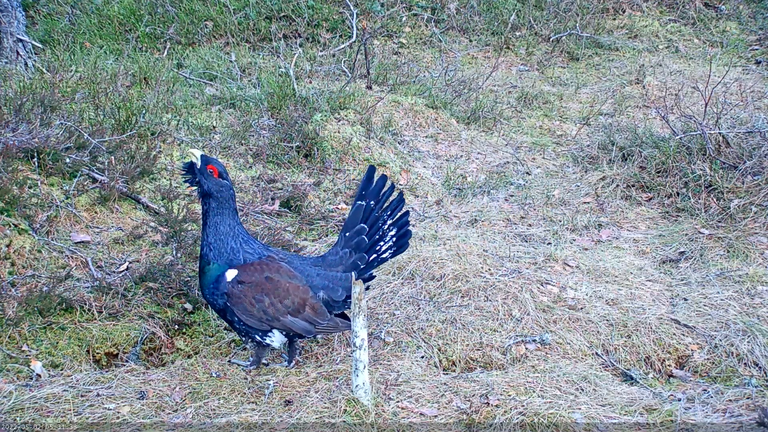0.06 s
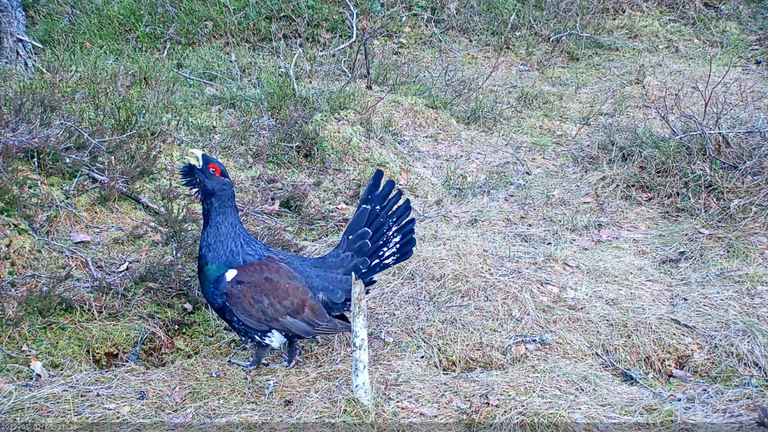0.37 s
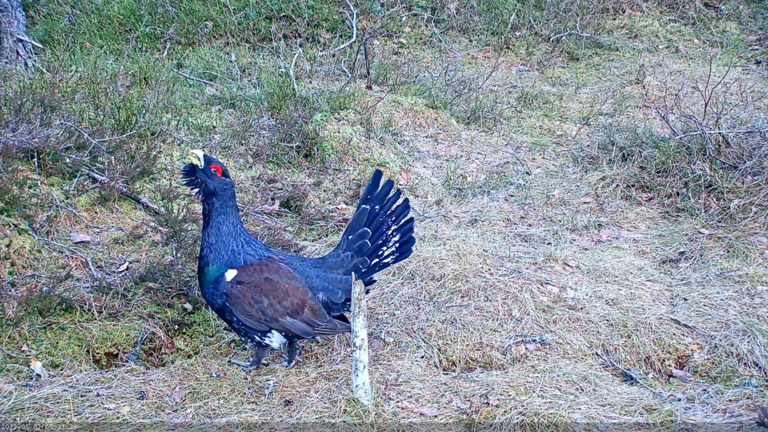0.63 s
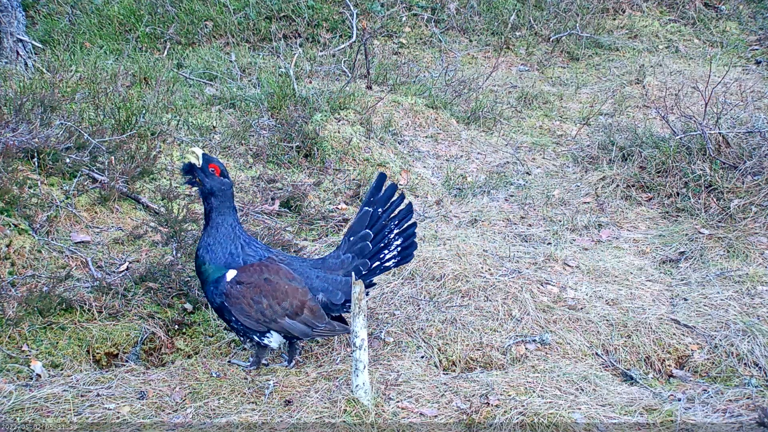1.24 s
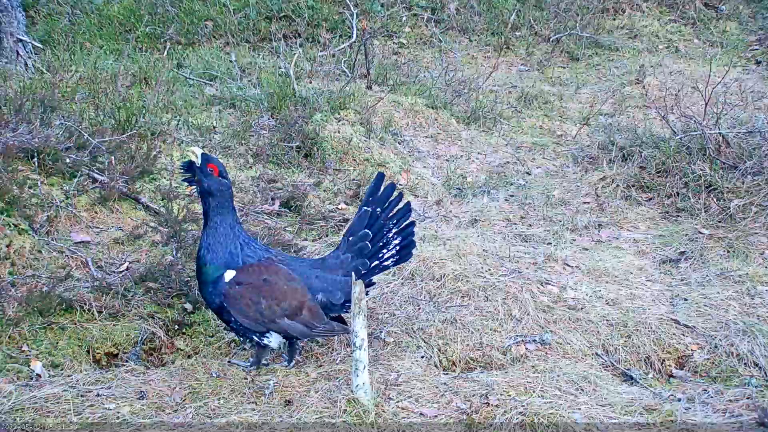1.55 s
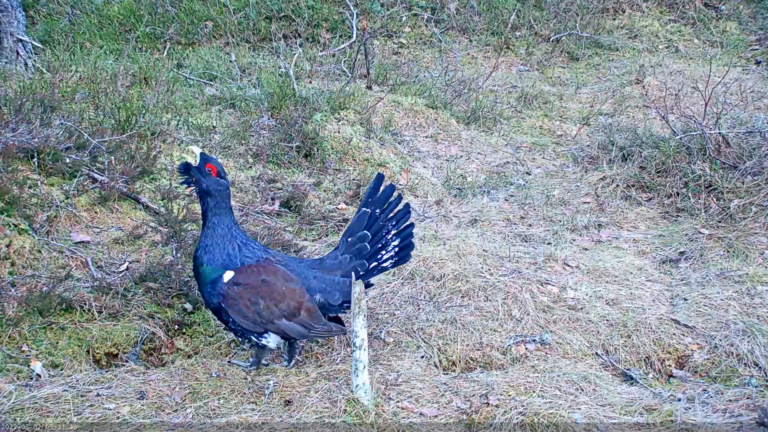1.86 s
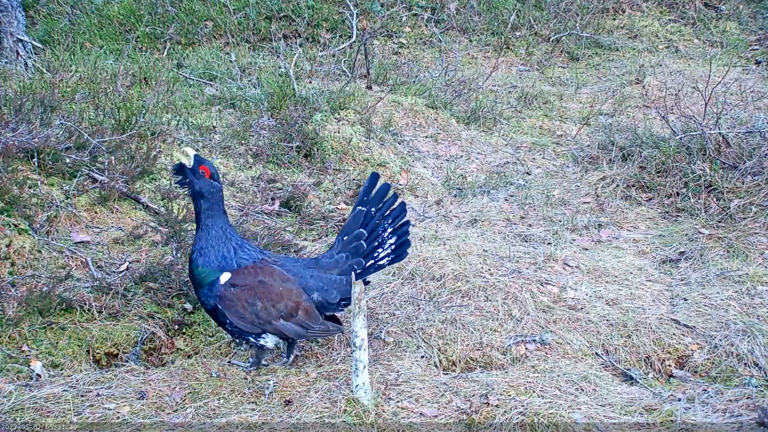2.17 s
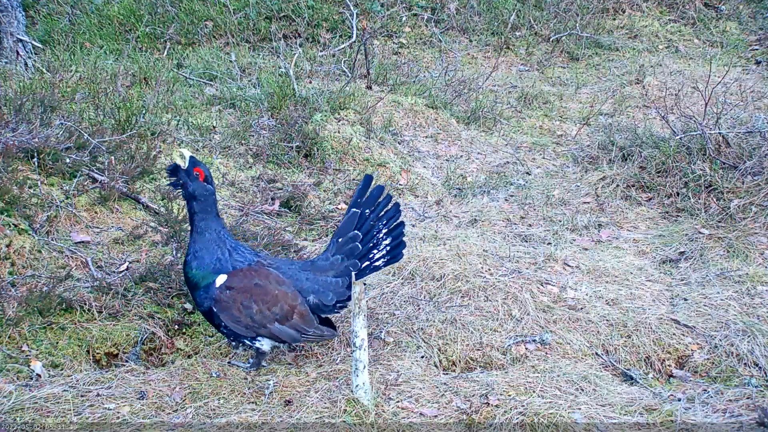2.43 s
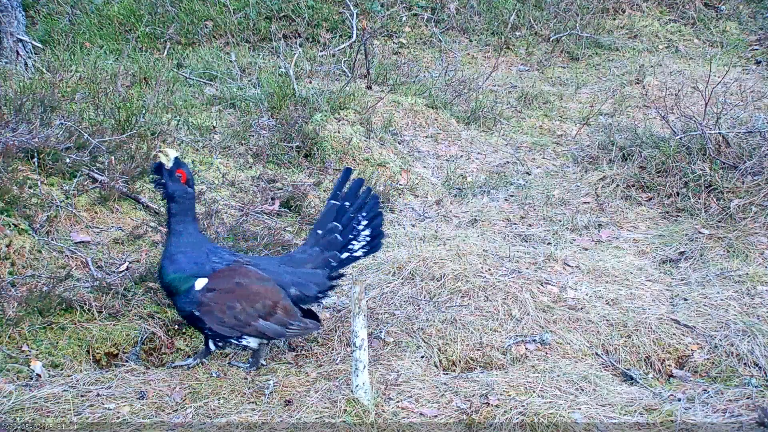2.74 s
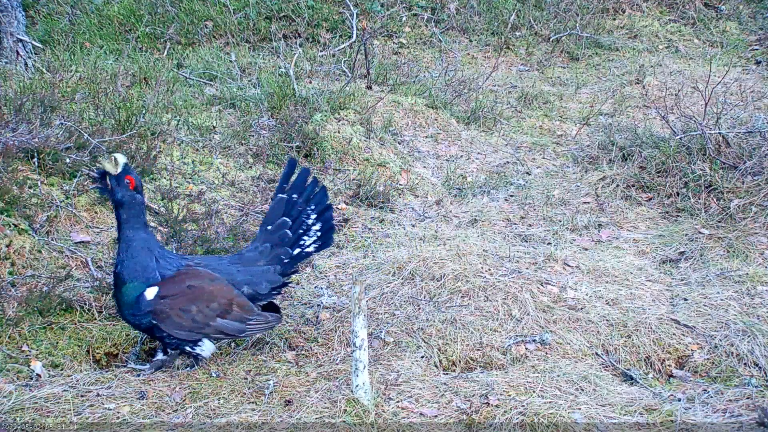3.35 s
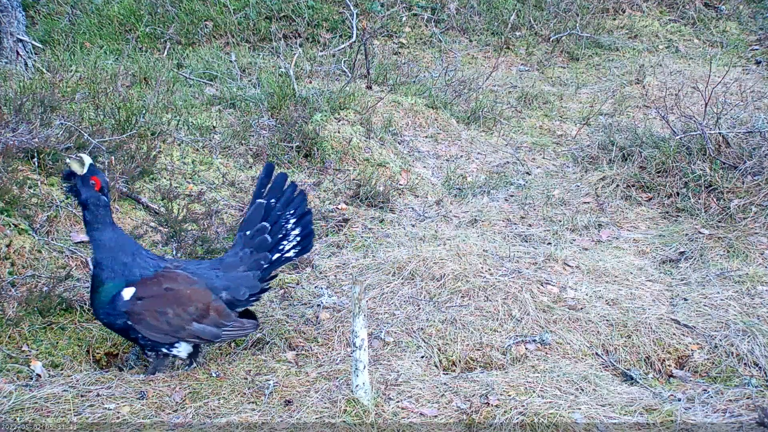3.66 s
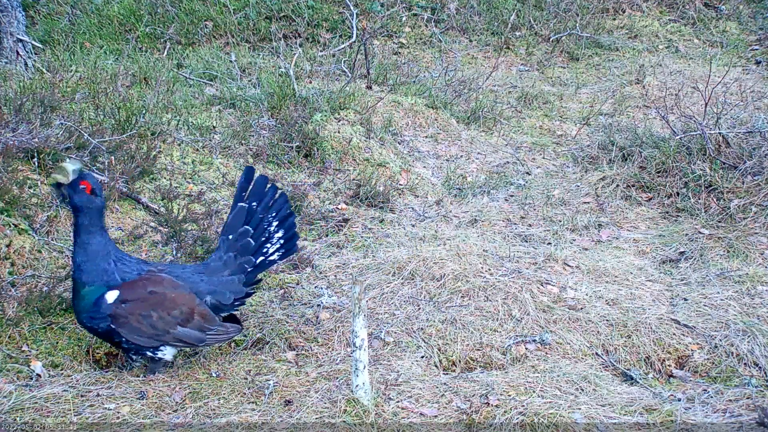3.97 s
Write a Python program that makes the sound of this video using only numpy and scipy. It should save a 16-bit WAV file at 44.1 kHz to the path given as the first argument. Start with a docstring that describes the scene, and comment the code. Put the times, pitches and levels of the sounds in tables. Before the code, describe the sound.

A large grouse clicks close by in hollow pairs at about 0.3, 1.3 and 2 seconds. The clicks quicken into a roll, ending near 3 seconds in a cork-like pop with low thumps, then faint steps in grass. Short dry rasps follow until about 3.9 seconds. From 3.3 seconds a small songbird repeats rising whistles and double notes. Faint distant birdsong, low rumble and soft hiss fill the forest behind.

```python
"""Open forest ground, a capercaillie displaying near the microphone. Paired throat clicks ring its
windpipe and beak, speed up into a roll and end in a cork pop, with low thumps, footsteps and brushed
grass as it moves. Then it whets in dry rasps, while a small songbird starts up with rising whistles and
double notes. The ground gives a close echo and the trees a faint tail; behind lie a far songbird,
low rumble and soft hiss."""
import sys
import numpy as np
from scipy import signal
from scipy.fft import rfft, irfft
from scipy.io import wavfile
from scipy.ndimage import uniform_filter1d

SR = 44100
rng = np.random.default_rng(int(sys.argv[2]) if len(sys.argv) > 2 else 0)


def pcm_store(signal):
    """Save signal as 16-bit PCM."""
    levels = np.round(np.clip(np.atleast_2d(signal), -1, 1) * 32767)
    wavfile.write(sys.argv[1], SR, levels.astype(np.int16).T)


N = 176400
T = np.arange(N) / SR

# Throat clicks, near the microphone: (time [s], snap level [dB], hollow pitch [Hz],
# hollow level before its swell [dB], hollow t60 [s], throat pitch [Hz], throat level [dB],
# beak pitch [Hz], upper pitch [Hz], upper level [dB], top pitch [Hz], top level [dB])
THROAT_CLICKS = [(0.339, -34.5, 400, -30, 0.039, 1385, -50.5, 2890, 4450, -39, 6070, -44.5),
                 (0.4806, -42, 385.5, -36, 0.039, 1420, -53, 2460, 3090, -40.5, 5410, -54.5),
                 (1.2958, -40, 388, -31, 0.028, 1370, -47.5, 2910, 4380, -40.5, 5170, -40.5),
                 (1.4063, -39, 338, -35.5, 0.036, 1346, -63, 2870, 4160, -53.5, 6030, -49.5),
                 (1.9477, -39, 370, -32.5, 0.021, 1324, -58.5, 3090, 5140, -46.5, 6160, -52.5),
                 (2.041, -41, 330, -36, 0.032, 1360, -57, 2840, 4620, -50, 6170, -46),
                 (2.3008, -37, 330, -35, 0.026, 1260, -58.5, 3090, 4650, -43, 6150, -54),
                 (2.3731, -45.5, 371, -36.5, 0.029, 1323, -56, 3030, 5100, -49, 6150, -48.5),
                 (2.5248, -39.5, 303, -34.5, 0.016, 1220, -64.5, 3400, 4600, -44, 5820, -51),
                 (2.6826, -43.5, 288, -35, 0.014, 1125, -66.5, 3420, 4840, -52.5, 6410, -47),
                 (2.7888, -46.5, 280, -43, 0.018, 1124, -67, 3360, 4550, -48.5, 5800, -59.5),
                 (2.8361, -42.5, 263, -40.5, 0.017, 1125, -66, 3220, 4520, -44.5, 6230, -64.5),
                 (2.8806, -39.5, 277, -32.5, 0.0083, 1260, -62.5, 3170, 4500, -43, 6140, -48.5)]
# Windpipe modes rung by every click: (pitch [Hz], level against the snap [dB], t60 [s])
WINDPIPE_MODES = [(491.7, -5.5, 0.019), (726, -10.5, 0.062), (1975, -17, 0.041), (2710, -3, 0.028),
                  (3260, -6, 0.017), (4024, -11.5, 0.02), (7200, -23, 0.016)]

def clicks(beak_db=5.5, beak_t60=0.015, upper_t60=0.019, throat_t60=0.034, swell_db=5, swell_s=0.0028):
    """Each snap rings the windpipe and the open beak; the hollow throat swells a moment later."""
    out, t = np.zeros(N), T[:SR // 8]
    swell = from_db(swell_db) * (1 - np.exp(-t / swell_s))
    for (s, snap_db, hollow_hz, hollow_db, hollow_t60, throat_hz, throat_db,
         beak_hz, upper_hz, upper_db, top_hz, top_db) in THROAT_CLICKS:
        windpipe = sum(from_db(snap_db + db) * ring(t, hz, t60) for hz, db, t60 in WINDPIPE_MODES)
        beak = from_db(snap_db + beak_db) * ring(t, beak_hz, beak_t60)
        beak += from_db(upper_db) * ring(t, upper_hz, upper_t60)
        beak += from_db(top_db) * ring(t, top_hz, upper_t60)
        hollow = from_db(hollow_db) * swell * ring(t, hollow_hz, hollow_t60)
        throat = from_db(throat_db) * ring(t, throat_hz, throat_t60)
        add(out, s, hollow + throat - windpipe - beak)
    return out

# The cork pop, soft pops just before it, and small hollow footsteps after it:
# (time [s], level [dB], start pitch [Hz], end pitch [Hz], t60 [s])
POPS_AND_STEPS = [(2.906, -59, 880, 880, .04), (2.976, -51, 524, 405, 0.19),
                  (3.052, -34.5, 698, 844, 0.031), (3.226, -49.5, 504, 430, 0.05),
                  (3.365, -53.5, 873, 860, 0.025), (3.659, -58.5, 933, 894, 0.046),
                  (3.753, -52, 805, 754, 0.029)]

def pops_and_steps(glide_s=0.0066, rise_s=0.00062):
    """Short hollow knocks whose pitch slides as they die."""
    out, t = np.zeros(N), T[:SR // 8]
    for s, db, start_hz, end_hz, t60 in POPS_AND_STEPS:
        hz = end_hz + (start_hz - end_hz) * np.exp(-t / glide_s)
        envelope = from_db(db - 60 * t / t60) * (1 - np.exp(-t / rise_s))
        add(out, s, envelope * sine(hz))
    return out

# Whetting strokes: (time [s], length [s], level [dB], low mode [Hz], middle mode [Hz], middle trim [dB])
WHET_STROKES = [(3.12, 0.058, -60.5, 2560, 4570, 0), (3.18, .06, -65.5, 2500, 4700, -2),
                (3.325, .045, -63, 3100, 4300, -1), (3.42, 0.022, -49.5, 2880, 4150, -1),
                (3.526, 0.038, -50, 2940, 4100, 1.5), (3.622, 0.03, -52.5, 3060, 4050, 2.5),
                (3.70, 0.038, -49, 2930, 4900, -4.5), (3.797, 0.082, -47.5, 3050, 4114, -1.5)]
# Resonances common to all strokes: (centre [Hz], width [Hz], relative level [dB])
WHET_MODES = [(1830, 200, -21), (2420, 300, -15), (5150, 350, -15), (6330, 550, -3), (7400, 400, -20)]
# Broad airy noise in each stroke: (frequency [Hz], relative level [dB])
WHET_AIR = [(400, 9), (1100, -9.5), (1800, -2), (2500, -5), (5200, 4.5), (6500, -16), (6900, -23.5),
            (7600, -7.5), (8500, -14.5)]
# Tone curve that dulls the top of the rasps: (frequency [Hz], gain [dB])
WHET_COLOUR = [(300, -5.5), (6550, -1), (6900, -8), (7500, -4.5), (8200, -12.5)]

def rasps(attack_s=0.011, release_s=0.014, pulse_hz=110, jitter=0.32, pulse_db=2, grain_db=0.5):
    """Friction noise, chopped by uneven pulses, through the throat and beak resonances."""
    out, t = np.zeros(N), T[:SR // 5]
    n = len(t)
    air = from_db(-9.5) * noise(WHET_AIR)
    for k, (s, length, db, low_hz, middle_hz, trim_db) in enumerate(WHET_STROKES):
        modes = WHET_MODES + [(low_hz, 500, -5.5), (middle_hz, 830, trim_db - 5.5)]
        friction = sum(from_db(mode_db) * band(hz, width, n) for hz, width, mode_db in modes)
        friction += air[k * n:(k + 1) * n]
        attack = np.minimum(t / attack_s, 1)
        release = np.exp(-np.maximum(t - length + release_s / 2, 0) / release_s)
        pulses = sine(pulse_hz * (1 + jitter * drift(pulse_hz, n)))
        roughness_db = pulse_db * pulses - grain_db * drift(pulse_hz, n)
        add(out, s, friction * attack * release * from_db(db + roughness_db))
    return colour(out, WHET_COLOUR)

# Low thumps as the bird moves: (time [s], level [dB], pitch [Hz])
BODY_THUMPS = [(2.919, -34, 118.4), (2.987, -37.5, 113.4), (3.020, -33.5, 118.5), (3.055, -37.5, 110)]

def thumps(rise_s=0.0075, scuff_db=-24.5, scuff_hz=420):
    """Soft pushes of a few low cycles, each with a dull scuff."""
    out, t = np.zeros(N), T[:SR // 8]
    swell = (t / rise_s * np.exp(1 - t / rise_s)) ** 2
    for s, db, hz in BODY_THUMPS:
        scuff = from_db(scuff_db) * band(scuff_hz, scuff_hz, len(t))
        push = np.sin(2 * np.pi * hz * t)
        add(out, s, from_db(db) * swell * (scuff - push))
    return out

# Dry grass at the bird's feet: (time [s], length [s], level [dB], centre [Hz], width [Hz])
GRASS_RUSTLES = [(2.947, 0.056, -73.5, 6400, 1370), (3.029, 0.037, -67, 5650, 1340),
                 (3.054, 0.055, -66.5, 4300, 347), (3.089, 0.051, -69.5, 7270, 392),
                 (3.134, 0.084, -66.5, 480, 330), (3.36, 0.83, -75, 507, 493)]

def rustles():
    """Grass brushed as the bird steps gives soft swells of noise."""
    out, t = np.zeros(N), T[:SR]
    for s, length, db, hz, width_hz in GRASS_RUSTLES:
        swell = np.sin(np.pi * np.minimum(t / length, 1))
        add(out, s, from_db(db) * swell * band(hz, width_hz, len(t)))
    return out

# Small songbird's rising whistle: (time from its break [s], pitch [Hz], relative level [dB])
RISING_GLIDE = [(-.022, 4430, -17.5), (-.003, 5200, -1), (.003, 4390, -14), (.009, 4860, -3.5),
                (.024, 5260, -0.5), (.045, 5750, -1), (.062, 6130, -1), (.069, 6150, -6)]
# Its repeats in the clearing: (time [s], level [dB], pitch [factor], length [factor])
RISING_CALLS = [(3.296, -46.5, 1.03, 0.97), (3.496, -39.5, 0.99, .92), (3.709, -36, 1.005, 1.01),
                (3.919, -37, 0.97, 1.03)]
# Double note after each whistle: (time from its first crest [s], pitch [Hz], relative level [dB])
DOUBLE_GLIDE = [(-.021, 3155, -11), (-.008, 3825, 2), (0, 4520, 1.5), (.003, 3434, -19),
                (.007, 2820, -16.5), (.0105, 3276, 2), (.014, 4450, -2.5), (.018, 3970, 6), (.024, 3627, 3),
                (.033, 3110, -15)]
# Its repeats: (time [s], level [dB], pitch [factor], length [factor])
DOUBLE_CALLS = [(3.381, -46, 1.0, 0.98), (3.592, -41.5, 1.0, 0.96), (3.803, -41, 0.99, 0.95),
                (4.012, -40.5, 1.0, 0.77)]

def small_songbird(glide, calls, waver_share=0.0031, waver_hz=239, flutter_db=0.86, flutter_hz=258):
    """Near-pure, slightly unsteady tones that repeat one glide."""
    out, t = np.zeros(N), T[:SR // 6]
    times, pitches, levels = np.transpose(glide)
    for s, db, pitch, stretch in calls:
        position = times[0] + t / stretch
        waver = 1 + waver_share * drift(waver_hz, len(t))
        hz = pitch * np.interp(position, times, pitches) * waver
        envelope = from_db(np.interp(position, times, levels)) * (position < times[-1])
        envelope = uniform_filter1d(envelope, size=60, mode="constant")  # soften the edges
        flutter = from_db(flutter_db * drift(flutter_hz, len(t)))
        add(out, s + times[0] * stretch, from_db(db) * envelope * flutter * sine(hz))
    return out

# Colour of the scatter from heather and trees: (frequency [Hz], gain [dB])
FOREST_COLOUR = [(100, -12.5), (400, 0), (1200, 11), (3000, 3.5), (4500, 7), (8000, 6.5)]

def clearing(direct, ground_lag_s=0.0035, ground_db=-10):
    """The microphone hears the direct sound, a close ground echo, heather scatter and a tail of trees."""
    ground = from_db(ground_db) * np.interp(T - ground_lag_s, T, direct)
    heather = scatter(db=-15, t60=0.1)
    trees = scatter(db=-19, t60=1)
    tail = colour(signal.fftconvolve(direct, heather + trees), FOREST_COLOUR)
    return direct + ground + tail[:N]

# Song far off in the forest: (time [s], length [s], level [dB], start pitch [Hz], end pitch [Hz])
FAR_SONG = [(0, 0.2, -73, 3560, 2940), (0.084, 0.13, -74, 6000, 3750), (.12, 0.28, -71, 4300, 2860),
            (.5, 0.35, -78, 3460, 2800), (1.053, 0.14, -78.5, 3940, 2910), (2.674, 0.17, -64, 2900, 2430),
            (2.798, 0.29, -64.5, 3100, 2675)]

def far_songbird(blur_hz=460):
    """Falling notes, blurred by the trees on their way to the microphone."""
    out, t = np.zeros(N), T[:SR // 4]
    for s, length, db, start_hz, end_hz in FAR_SONG:
        progress = np.minimum(t / length, 1)
        tone = sine(start_hz + (end_hz - start_hz) * progress)
        add(out, s, from_db(db) * np.sin(np.pi * progress) * drift(blur_hz, len(t)) * tone)
    return out

# Low rumble behind the birds: (frequency [Hz], relative level [dB])
RUMBLE_SPECTRUM = [(12, -37), (20, -4), (49, -9.5), (69, -7.5), (91, 0), (131, -9), (151, -18),
                   (178, -20.5), (209, -23), (250, -25.5), (320, -67), (550, -120)]
# Soft hiss above it: (frequency [Hz], relative level [dB])
HISS_SPECTRUM = [(120, -31), (200, -2.5), (352, -4.5), (558, -4.5), (611, -9), (1350, -18), (2910, -12.5),
                 (6960, -26.5), (7750, -32.5), (10100, -49.5), (17000, -120)]

def ambience(rumble_db=-56.5, hiss_db=-70):
    """The steady bed of the place: low rumble and soft hiss."""
    return from_db(rumble_db) * noise(RUMBLE_SPECTRUM) + from_db(hiss_db) * noise(HISS_SPECTRUM)

def from_db(db):
    """Decibels to gain."""
    return 10 ** (np.asarray(db) / 20)

def rms_one(x):
    """Scale to unit power."""
    return x / np.sqrt(np.mean(x ** 2) + 1e-20)

def add(out, s, x):
    """Mix x in at time s."""
    i = int(s * SR)
    out[i:i + len(x)] += x[:max(N - i, 0)]

def sine(hz):
    """A sine that follows a moving frequency."""
    return np.sin(2 * np.pi * np.cumsum(hz) / SR)

def ring(t, hz, t60, rise_s=0.00088):
    """One mode that builds quickly and dies away."""
    return np.sin(2 * np.pi * hz * t) * from_db(-60 * t / t60) * (1 - np.exp(-t / rise_s))

def colour(x, points):
    """Shape by (Hz, dB) points, falling steeply beyond their ends."""
    hz, db = np.transpose(points)
    f = np.maximum(np.arange(len(x) // 2 + 1) * SR / len(x), 1)
    skirts = np.minimum(f / hz[0], 1) ** 6 * np.minimum(hz[-1] / f, 1) ** 6
    gain = from_db(np.interp(np.log(f), np.log(hz), db))
    return irfft(rfft(x) * gain * skirts, len(x))

def noise(points):
    """Unit noise of a given spectrum."""
    return rms_one(colour(rng.standard_normal(N), points))

def band(hz, width_hz, size):
    """Unit noise in one resonance."""
    sos = signal.butter(2, [max(hz - width_hz / 2, 20), hz + width_hz / 2], "band", fs=SR, output="sos")
    return rms_one(signal.sosfilt(sos, rng.standard_normal(size)))

def drift(hz, size):
    """Unit random wander up to a given rate."""
    return rms_one(signal.sosfilt(signal.butter(2, hz, fs=SR, output="sos"), rng.standard_normal(size)))

def scatter(db, t60):
    """Dense reflections as decaying noise with a total energy of db."""
    reflections = rng.standard_normal(SR) * from_db(-60 * T[:SR] / t60)
    return from_db(db) * rms_one(reflections) / np.sqrt(SR)

def scene():
    """One microphone in the clearing: capercaillie and small songbird near, the forest behind."""
    capercaillie = clicks() + pops_and_steps() + thumps() + rustles() + rasps()
    songbird = small_songbird(RISING_GLIDE, RISING_CALLS) + small_songbird(DOUBLE_GLIDE, DOUBLE_CALLS)
    background = ambience() + far_songbird()
    return (clearing(capercaillie + songbird) + background)[None]

def record(dry):
    """A steep low-pass cuts the top off the microphone signal."""
    cutoff_hz = 7700
    return signal.sosfilt(signal.ellip(10, .2, 70, cutoff_hz, fs=SR, output="sos"), dry)

dry = scene()
out = record(dry)
pcm_store(out)
```